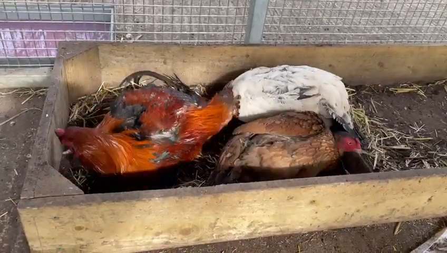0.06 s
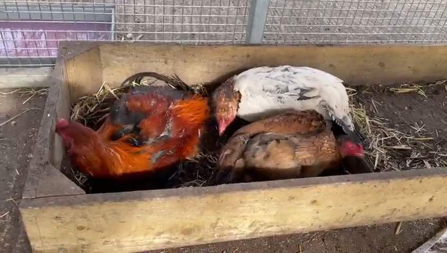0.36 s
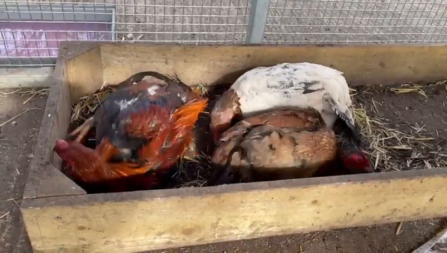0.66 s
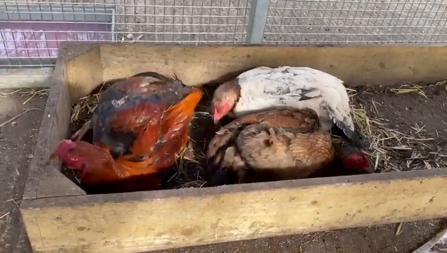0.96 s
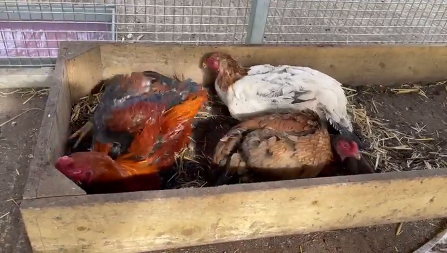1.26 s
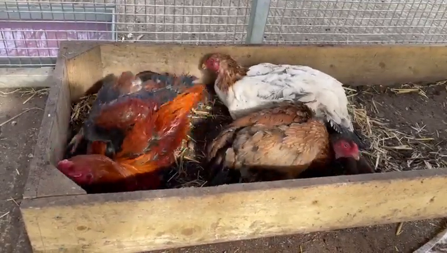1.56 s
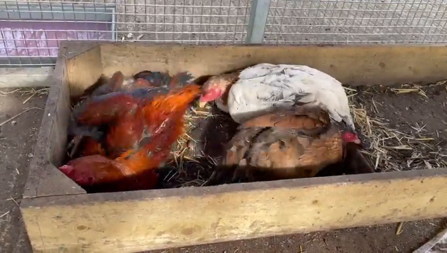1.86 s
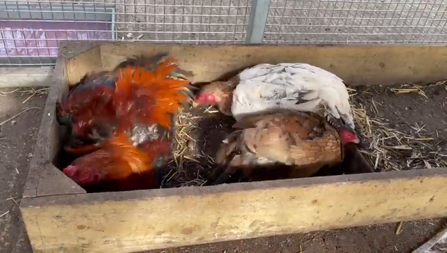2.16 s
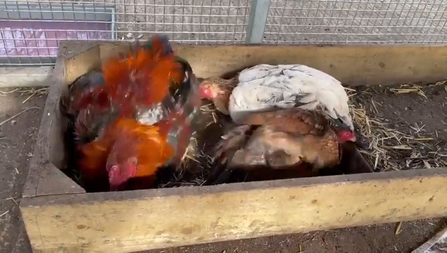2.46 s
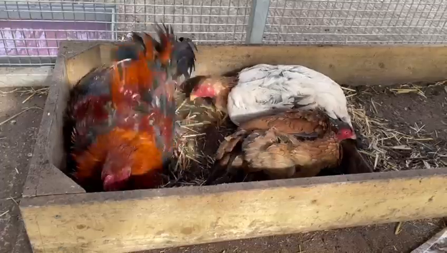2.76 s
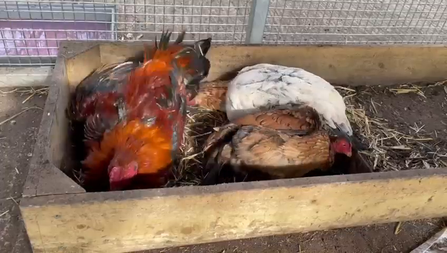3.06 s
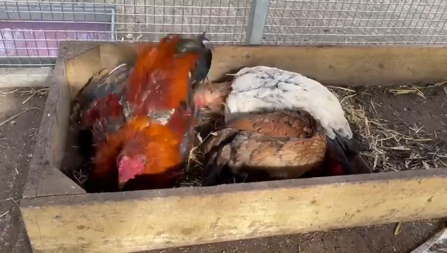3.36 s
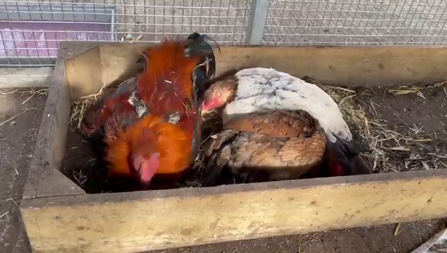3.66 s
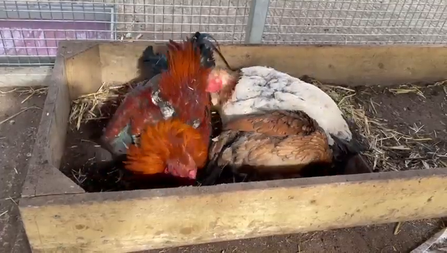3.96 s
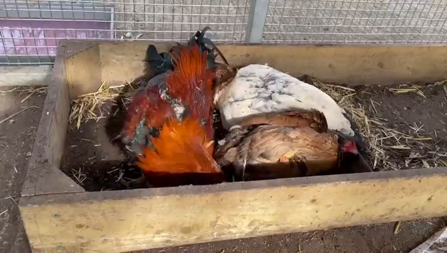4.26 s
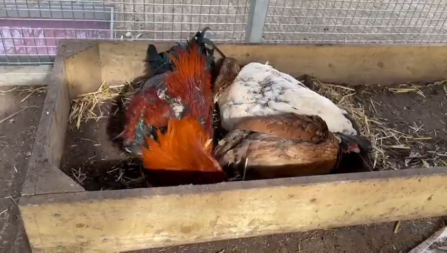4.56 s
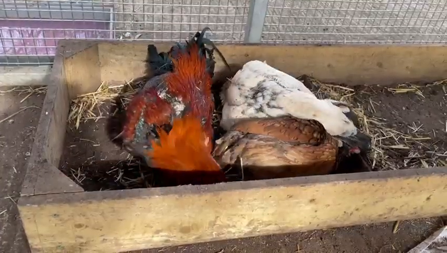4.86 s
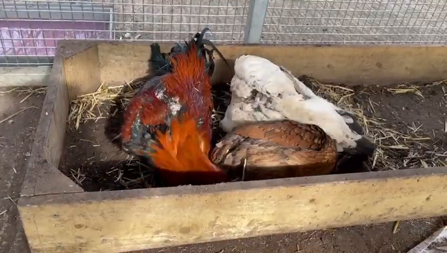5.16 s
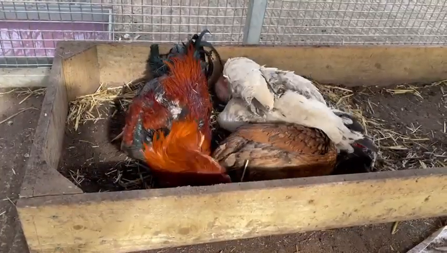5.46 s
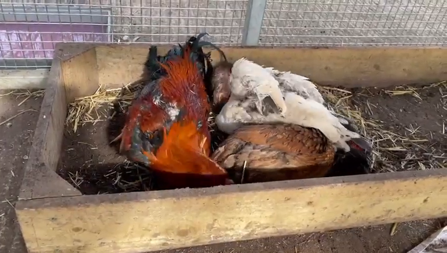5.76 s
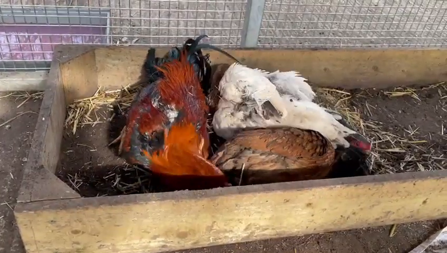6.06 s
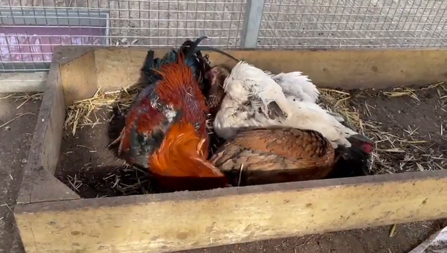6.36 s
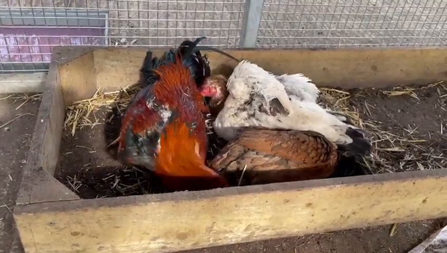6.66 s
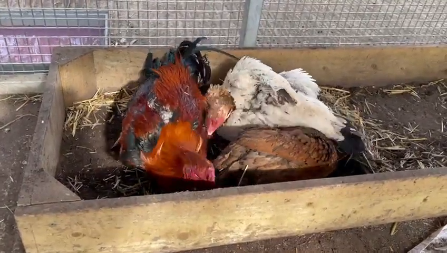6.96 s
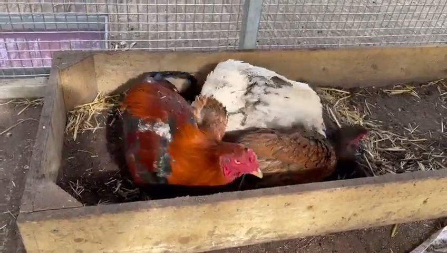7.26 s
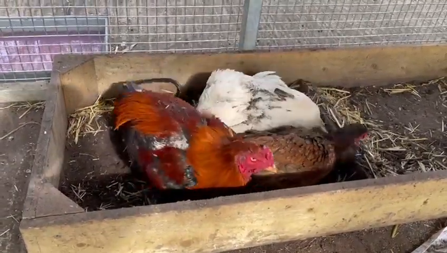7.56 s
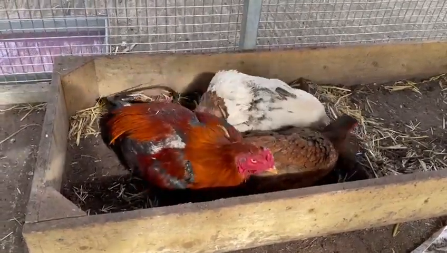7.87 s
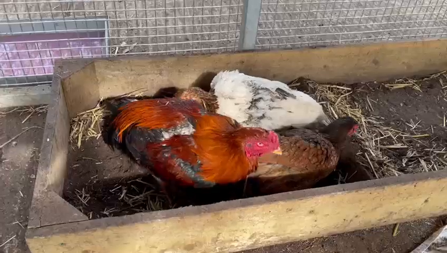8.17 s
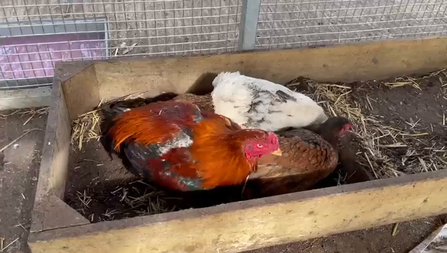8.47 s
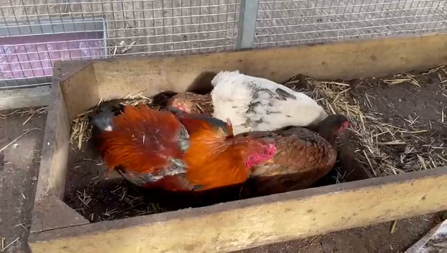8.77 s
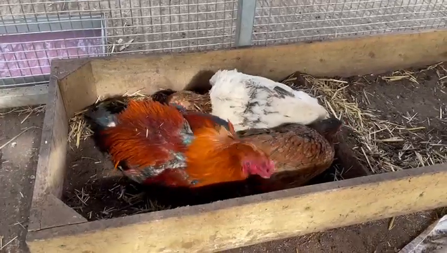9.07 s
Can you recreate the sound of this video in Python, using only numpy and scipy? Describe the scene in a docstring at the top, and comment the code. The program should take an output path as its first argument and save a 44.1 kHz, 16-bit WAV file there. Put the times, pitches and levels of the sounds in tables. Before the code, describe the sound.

Soft, close rustling and crackling of straw comes from chickens shuffling in a wooden box in an outdoor pen. A quick run of gritty scratches and knocks follows a single cluck. Two more short clucks come midway, then further wooden thumps and a couple of clucks near the end. Behind the nearby sounds, small birds chirp on and off and far traffic rumbles steadily.

```python
"""Distant traffic rumbles and hisses under a soft rustle of straw, and small birds chirrup and cheep.
Close to a phone, chickens dust-bathe in a wooden box: feathers sweep straw and soil into tiny contacts,
feet knock the boards into ringing and dry stalks snap. The rooster gives a few very short clucks,
each a brief buzz of the syrinx, and kicks through the grit."""
import sys
import numpy as np
from scipy import signal
from scipy.fft import rfft, irfft
from scipy.io import wavfile
from scipy.ndimage import uniform_filter1d

SR = 44100
rng = np.random.default_rng(int(sys.argv[2]) if len(sys.argv) > 2 else 0)


def inscribe(sig):
    """Save sig as 16-bit PCM at rate SR to the path in sys.argv[1].

    A 1-D sig is mono; a 2-D sig holds one channel per row.
    Samples are clipped to [-1, 1] before scaling.
    """
    pcm = np.round(np.clip(np.atleast_2d(sig).T, -1, 1) * 32767)
    wavfile.write(sys.argv[1], SR, pcm.astype(np.int16))


N = 410571
T = np.arange(N) / SR
FREQS = np.fft.rfftfreq(N, 1 / SR)


def undb(db):
    """Decibels to gain."""
    return 10 ** (np.asarray(db) / 20)


def unit(x):
    """Scale to rms 1."""
    return x / np.sqrt(np.mean(x ** 2))


def curves(table):
    """Every column of a timed table, sample by sample."""
    s, *columns = np.transpose(table)
    return [np.interp(T, s, c) for c in columns]


def across(points):
    """Join (Hz, value) points on a log-frequency axis."""
    hz, value = np.transpose(points)
    return np.interp(np.log(FREQS + 1), np.log(hz), value)


def colour(x, spectrum):
    """Minimum-phase filter; keeps the power of white input."""
    cepstrum = irfft(np.log(unit(undb(across(spectrum)))), N)
    cepstrum[1:N // 2] *= 2
    cepstrum[N // 2 + 1:] = 0
    return irfft(rfft(x) * np.exp(rfft(cepstrum)), N)


def band(x, lo_hz, hi_hz):
    """Band-pass."""
    sos = signal.butter(2, [lo_hz, min(hi_hz, SR / 2 - 1000)], "band", fs=SR, output="sos")
    return signal.sosfilt(sos, x)


def walk(rate_hz):
    """Slow random drift; rms 1."""
    hold = int(SR / rate_hz)
    steps = np.repeat(rng.standard_normal(N // hold + 1), hold)
    return unit(uniform_filter1d(steps, hold)[:N])


def add(out, start_s, x):
    """Mix x into out."""
    i = max(int(start_s * SR), 0)
    out[..., i:i + x.shape[-1]] += x[..., :max(N - i, 0)]


def reverb(x, t60_s):
    """Diffuse reflections, unrelated left and right."""
    t = T[:SR]
    tail = rng.standard_normal((2, SR)) * undb(-60 * t / t60_s) * (t > .006)
    return signal.fftconvolve(x[None], tail / np.sqrt(np.sum(tail ** 2) / 2))[:, :N]


def grains(rate_hz, spread_db):
    """Dense tiny contacts of unequal size; rms 1."""
    size = undb(spread_db * np.minimum(rng.exponential(size=N), 4))
    return unit((rng.random(N) < rate_hz / SR) * size * rng.choice([-1, 1], N))


# Traffic spectra. Each row: frequency in Hz, relative density in dB.
RUMBLE_SPECTRUM = [(15, -46.5), (25, -20), (38, -17), (52, -5.5), (72, -4.5), (100, -7), (125, -10.5),
                   (170, -14.5), (230, -15), (320, -24), (500, -26), (900, -32), (3000, -102.5)]
TYRE_SPECTRUM = [(150, -2.5), (350, 0.5), (600, 1.5), (950, 6), (1200, 4), (1600, -6), (2200, -13.5),
                 (3500, -26), (6000, -33), (8500, -80), (12000, -31.5)]
# Traffic draws nearer. Each row: time in seconds, relative tyre level in dB.
TYRE_LEVELS = [(0.0, -57.5), (2.87, -55), (3.76, -57), (6.2, -56), (7.21, -53), (8.45, -54), (9.31, -50)]
# One engine speeds up, then eases off. Each row: time in seconds, firing rate in Hz, relative level in dB.
ENGINE_RUN = [(0, 60, -49.5), (3.9, 63, -57), (4.75, 71, -47.5), (5.5, 75, -49.5), (6.6, 83, -43.5),
              (7.0, 82, -70), (8.1, 78, -49.5), (9.3, 62, -65)]


def traffic(hum_hz=205, hum_db=-61):
    """Rumble alike in both ears, diffuse tyre noise, one far engine and a faint steady hum."""
    tyre_db, = curves(TYRE_LEVELS)
    firing_hz, engine_db = curves(ENGINE_RUN)
    ears = np.array([[1], [-1]])
    mid, side, tyre_mid, tyre_side = rng.standard_normal((4, N))
    rumble = colour(mid + undb(-19) * ears * side, RUMBLE_SPECTRUM)
    rumble *= undb(-48.5 + 0.24 * T + 0.57 * walk(6))
    tyres = colour(tyre_mid + undb(1.5) * ears * band(tyre_side, 516, 9000), TYRE_SPECTRUM)
    tyres *= undb(tyre_db + 3 + .5 * walk(7.3) + ears * 1.2)
    engine = np.sqrt(2) * np.sin(2 * np.pi * np.cumsum(firing_hz) / SR)
    engine *= undb(engine_db - 3 + 2.7 * walk(4.6))
    hum = undb(hum_db + 2 * walk(2.95)) * np.sin(2 * np.pi * hum_hz * T)
    return rumble + tyres + engine + hum


def stalks(patchy_db=3):
    """Stalks of different lengths crackle, each in its own band, coming and going independently."""
    edges_hz = np.geomspace(1500, 13000, 12)
    return unit(sum(band(grains(rate_hz=550, spread_db=-0.5), lo, hi) * undb(patchy_db * walk(45))
                    for lo, hi in zip(edges_hz, edges_hz[1:])))


# How busily the chickens shuffle. Each row: time in seconds, relative level in dB.
SHUFFLE_LEVELS = [(0.0, -80.5), (0.47, -79.5), (0.65, -69.5), (1.04, -84.5), (1.89, -77), (2.41, -70),
                  (3.42, -70), (3.71, -77), (4.82, -84.5), (5.26, -72.5), (5.81, -83), (6.09, -78),
                  (6.58, -82.5), (7.18, -77), (8.68, -85), (9.31, -74.5)]
# Wing or foot sweeps. Each row: peak time in seconds, relative level in dB, length in seconds,
# soil weighting in dB.
SWEEPS = [(0.697, -56, 0.024, 11), (0.77, -58, 0.035, 12), (0.815, -63, 0.05, -10), (1.005, -59, 0.022, 7),
          (1.06, -57.5, 0.06, 9.5), (1.097, -54, 0.042, -7), (1.32, -62.5, 0.082, 10),
          (1.395, -54, 0.047, -13), (1.577, -69, 0.02, 23), (1.64, -62, 0.045, 12), (1.71, -48.5, 0.03, -3),
          (1.936, -62, 0.043, 15), (3.35, -58, 0.03, 5), (3.639, -60, 0.026, 11.5),
          (4.899, -63.5, 0.036, 7), (5.3, -64, 0.063, -2), (5.94, -57, 0.051, 7.5),
          (6.52, -60.5, 0.057, -12), (6.58, -67, 0.04, 9), (6.8, -51.5, 0.014, 6.5),
          (6.955, -67, 0.059, 13), (7.125, -66, 0.025, -4), (7.264, -55.5, 0.041, -8),
          (8.04, -64.5, 0.095, 13), (8.16, -71, 0.04, 18), (8.26, -76, 0.068, 22.5),
          (8.335, -66.5, 0.077, 14)]
# Litter spectra. Each row: frequency in Hz, relative density in dB.
STRAW_SPECTRUM = [(200, 1.5), (600, 1), (1200, 1), (1800, -6), (3500, 1), (5500, -5), (7000, -0.5),
                  (9000, -3.5), (11000, 2), (13000, -30)]
SOIL_SPECTRUM = [(150, -13), (400, 4), (1200, -4.5), (1900, -2), (3600, -10.5), (5500, -15), (9000, -41)]


def rustle(swell_share=0.47, restless_db=2.5):
    """Each sweep crackles the straw, rubs the feathers and shifts the duller soil below."""
    shuffle_db = curves(SHUFFLE_LEVELS)[0] + restless_db * walk(14)
    straw_power = undb(shuffle_db + 8) ** 2
    soil_power = undb(shuffle_db - 3) ** 2
    for peak_s, db, length_s, soil_db in list(SWEEPS) + kick_sweeps():
        slope_s = length_s * np.where(T < peak_s, swell_share, 1 - swell_share)
        power = undb(db) ** 2 * np.exp(-1.8 * np.abs(T - peak_s) / slope_s)
        straw_power += power
        soil_power += power * undb(soil_db) ** 2
    straw = undb(-5.5) * stalks()
    feathers = undb(-4) * grains(rate_hz=5000, spread_db=-2.5)
    crackle = colour((straw + feathers) * undb(2 * walk(60)), STRAW_SPECTRUM)
    crumble = colour(grains(rate_hz=3000, spread_db=3), SOIL_SPECTRUM)
    return undb(2.5) * np.sqrt(straw_power) * crackle + undb(-4) * np.sqrt(soil_power) * crumble


def whistle(length_s, start_hz, end_hz, shape=None, waver=.017, trill=0, trill_hz=171):
    """One note, gliding evenly or along a shape; waver and trill are shares of its pitch."""
    progress = np.linspace(0, 1, int(length_s * SR))
    share, height, db = np.transpose(shape or [(0, 1, 0), (1, 0, 0)])
    flutter = waver * unit(uniform_filter1d(rng.standard_normal(len(progress)), 96))
    flutter += trill * np.sin(2 * np.pi * trill_hz * progress * length_s)
    hz = (end_hz + (start_hz - end_hz) * np.interp(progress, share, height)) * (1 + flutter)
    envelope = undb(np.interp(progress, share, db)) * np.abs(np.sin(np.pi * progress)) ** 0.14
    return envelope * np.sin(2 * np.pi * np.cumsum(hz) / SR)


# Small birds' notes. Each row: start and length in seconds, start and end in Hz, relative level in dB.
BUZZY_NOTES = [(0.15, 0.07, 3030, 2700, -63), (3.78, 0.074, 2380, 2810, -60.5),
               (4.26, 0.045, 2300, 2600, -53), (4.725, 0.029, 2310, 2090, -55.5),
               (5.63, 0.05, 2400, 2030, -51.5), (8.21, 0.04, 4200, 4500, -60),
               (8.66, 0.06, 5160, 4260, -61), (8.7, 0.038, 6150, 5400, -61),
               (8.785, 0.032, 5000, 5880, -56.5)]
THIN_NOTES = [(0.288, 0.16, 8200, 7650, -70), (0.39, 0.19, 7480, 7000, -63), (0.85, 0.061, 3950, 3530, -64),
              (0.91, 0.1, 3570, 3540, -54), (0.975, 0.083, 3170, 3070, -63), (1.1, 0.084, 3820, 3900, -60),
              (1.23, 0.06, 2860, 2820, -63), (3.88, 0.04, 4100, 3900, -64), (5.12, 0.05, 4370, 4140, -53),
              (6.14, 0.045, 5250, 4470, -61), (6.215, 0.06, 3270, 2800, -63),
              (7.425, 0.04, 4220, 4650, -57), (7.49, 0.055, 4470, 4600, -65),
              (7.642, 0.03, 4720, 4530, -49), (7.657, 0.02, 4060, 4050, -47),
              (8.175, 0.03, 3300, 3510, -58), (8.51, 0.041, 3440, 3280, -58),
              (8.875, 0.05, 4130, 3800, -60), (8.915, 0.16, 3270, 3120, -61)]


def chirrups():
    """Thin whistles waver a little in pitch; buzzy notes waver enough to sound rough."""
    out = np.zeros(N)
    for notes, waver in (THIN_NOTES, .017), (BUZZY_NOTES, .09):
        for start_s, length_s, start_hz, end_hz, db in notes:
            add(out, start_s, undb(db - 4) * whistle(length_s, start_hz, end_hz, waver=waver))
    return out


# One bird's repeated cheep. Each row: start and length of the fall in seconds, relative level in dB,
# ledge pitch in Hz, closing note against the fall in dB.
CHEEP_CALLS = [(0.55, 0.071, -43, 3280, -13), (5.031, 0.091, -44.5, 3150, -17),
               (5.54, 0.115, -55.5, 3140, 0), (7.56, 0.088, -42.5, 3180, -14)]
# The pitch hooks up, falls to a ledge and drops off it. Each row: share of the length,
# height (ledge 0, top 1), relative level in dB.
CHEEP_CONTOUR = [(0, .6, -10), (.1, .97, 0), (.26, .92, 2.5), (.38, .45, 1), (.48, .06, -7), (.6, 0, -1),
                 (.82, 0, -1.5), (1, -.38, -6)]


def cheeps(top_hz=4176, lead_s=0.019, gap_s=0.02, close_s=0.095):
    """A short rising note leads into a trilled fall; a low held note closes it."""
    out = np.zeros(N)
    for start_s, fall_s, db, ledge_hz, close_db in CHEEP_CALLS:
        gain = undb(db - 2)
        lead = whistle(lead_s, start_hz=4520, end_hz=4950, waver=.045)
        fall = whistle(fall_s, top_hz, ledge_hz, CHEEP_CONTOUR, trill=.024)
        close = whistle(close_s, start_hz=2600, end_hz=2850, waver=.045)
        add(out, start_s - lead_s, gain * undb(-12) * lead)
        add(out, start_s, gain * fall)
        add(out, start_s + fall_s + gap_s, gain * undb(close_db) * close)
    return out


def small_birds():
    """Song from some way off: reflections off ground and pen roughen it, a diffuse tail blurs it."""
    song = cheeps() + chirrups()
    early = undb(-4.5) * reverb(song, t60_s=.08)
    late = undb(-3.5) * reverb(song, t60_s=.43)
    return undb(-5) * song + early + late


# Board modes. Each row: frequency in Hz, relative level in dB, T60 in seconds.
BOARD_MODES = [(167, -9, 0.12), (235, -0.5, 0.066), (272, -3.5, 0.061), (353, 1, 0.033),
               (446.5, -0.5, 0.071), (562, 1, 0.045), (681, -2.5, 0.043), (789, 1.5, 0.031),
               (970, -18, 0.045), (1140, -25, 0.082), (1394, 5.5, 0.045), (1403, 0.5, 0.072),
               (2550, -25, 0.034)]
# Feet and bodies hit the box. Each row: start in seconds, relative level in dB, main pitch in Hz,
# left minus right in dB, claw tick against the knock in dB, roll-off from the main pitch in dB/octave.
BOX_BUMPS = [(0.738, -38, 378, -3, -22, 9), (0.768, -42.5, 480, 1, -14, -4), (2.153, -37, 410, -3, -20, 8),
             (2.256, -31.5, 384, -3, -10, 3.5), (2.444, -36.5, 229, 0, -8, 8),
             (2.479, -29.5, 172, -3, -21, 14.5), (2.713, -36.5, 543, 0, -14, 4),
             (2.948, -30.5, 360, 0, -7, 6.5), (3.194, -32.5, 407, 1, -14, 12),
             (3.414, -27, 300, 0.5, -29, 6.5), (4.092, -35.5, 280, 1, -30, 8), (4.544, -50, 450, 3, -16, 5),
             (4.894, -39, 700, 1, -4, 1), (5.515, -41.5, 420, 0, -24, 7),
             (5.852, -34.5, 330, -1, -8.5, 4.5), (7.137, -32.5, 360, -1, -26, 6.5),
             (7.317, -35, 280, 1, -15, 1), (7.997, -27, 483, 1.5, -29, 7), (8.296, -23, 463, 1, -13, 11.5),
             (8.323, -39.5, 300, 1, -25, 8), (9.005, -39.5, 520, 1, -26, 7)]


def bumps(contact_s=.003, rattle_s=0.045, grit_s=0.014, tick_s=0.0058, lead_s=.002):
    """A claw ticks, the foot rings the boards and grinds soil; where it lands favours some modes."""
    out, t = np.zeros((2, N)), T[:8192]
    scuff = undb(-24) * t / contact_s * np.exp(-t / contact_s)
    rattle = undb(-37) * np.exp(-t / rattle_s)
    grit_envelope = undb(-10) * np.sqrt(2 * np.e * t / grit_s) * np.exp(-t / grit_s)
    for start_s, db, main_hz, pan_db, tick_db, rolloff_db in BOX_BUMPS:
        claws, soil = rng.standard_normal((2, len(t)))
        push = claws * (scuff + rattle)
        push[int(lead_s * SR)] += 1  # the impact
        ring = np.zeros(len(t))
        for k, (hz, mode_db, t60_s) in enumerate(BOARD_MODES):
            struck_db = mode_db - rolloff_db * abs(np.log2(hz / main_hz))
            ring += (-1) ** k * undb(struck_db - 60 * t / t60_s) * np.sin(2 * np.pi * hz * t)
        knock = signal.fftconvolve(push, ring)[:len(t)]
        knock /= np.sqrt(np.mean(knock[:700] ** 2))
        grit = unit(band(soil, 580, 1040)) * grit_envelope
        tick = undb(tick_db) * unit(band(rng.standard_normal(len(t)), 1100, 2700)) * np.exp(-t / tick_s)
        gain = undb(db - 7 + np.array([[pan_db], [-pan_db]]) / 2)
        add(out, start_s - lead_s, (knock + grit) * gain)
        add(out, start_s, tick * gain)
    return out


def thin_snaps(count=20, centre_hz=4370, width_octaves=0.53):
    """Rows like STRAW_SNAPS: thin straws break at random, louder when the shuffling is busy."""
    when, size, pitch = rng.uniform(-1, 1, (count, 3)).T
    start_s = (when + 1) / 2 * T[-1]
    peak_db = np.interp(start_s, *np.transpose(SHUFFLE_LEVELS)) + 20 + 5 * size
    return list(zip(start_s, peak_db, centre_hz * 2 ** (0.28 * pitch), [width_octaves] * count))


# The loudest straw breaks. Each row: start in seconds, peak in dB, band centre in Hz, width in octaves.
STRAW_SNAPS = [(0.812, -44.5, 5000, 2), (0.9894, -38.5, 3970, 1.2), (1.0952, -36, 3700, 1.8),
               (1.3867, -39.5, 4000, 1.3), (1.4082, -38, 4230, 1), (1.5718, -54, 3700, 1),
               (1.7205, -39, 4200, 1.3), (2.1999, -34.5, 4130, 0.4), (2.2214, -41, 4400, 0.41),
               (2.2945, -39, 7000, 1.3), (2.4187, -30, 4230, 1.1), (2.5132, -46, 4700, 0.61),
               (3.817, -51, 3500, 0.83), (3.862, -48, 8000, 1.3), (3.9629, -44, 10900, 1.4),
               (4.005, -49, 2900, 1), (4.777, -55, 3600, 1), (5.9304, -48, 4580, 1.1),
               (5.944, -44, 3600, 1.3), (5.953, -45, 3300, 1.4), (6.106, -35.5, 9800, 0.63),
               (6.7925, -54, 2600, 2.3), (7.254, -47, 6500, 0.81), (8.153, -50, 9000, 1.5)]


def snaps(tick_s=0.0017, splinter_s=.009, splinter_db=-18):
    """A dry stalk breaks: one sharp tick and a faint tail of splinters."""
    out, t = np.zeros(N), T[:2048]
    envelope = np.exp(-t / tick_s) + undb(splinter_db) * np.exp(-t / splinter_s)
    for start_s, peak_db, hz, octaves in list(STRAW_SNAPS) + thin_snaps():
        edge_ratio = 2 ** (octaves / 2)
        tick = band(rng.standard_normal(len(t)) * envelope, hz / edge_ratio, hz * edge_ratio)
        add(out, start_s, tick / np.abs(tick).max() * undb(peak_db))
    return out


# Open-beak resonances. Each row: centre in Hz, width in Hz, relative level in dB.
BEAK_BANDS = [(1340, 440, -2), (2270, 250, -4.5), (2860, 300, 1), (4010, 480, -4.5), (7330, 1600, -14.5)]
# The rooster's clucks. Each row: peak time in seconds, level in dB, pitch in Hz, glide in octaves/s,
# swell scale in seconds, then second harmonic, upper harmonics and rasp in relative dB.
ROOSTER_CLUCKS = [(2.052, -23, 356.8, 9.2, 0.0098, -0.5, -11, -27.5),
                  (4.2086, -22, 430.3, 6.4, 0.02, -9, -22, -23),
                  (4.358, -28, 285.4, 5.5, 0.0073, 1.5, -4.5, -46),
                  (7.942, -32, 401.5, 3.8, 0.0066, 8, -12, -30),
                  (9.156, -22.5, 335.5, 1.4, 0.0095, 2, -18, -28.5)]


def clucks(release_s=0.0065, jitter_octaves=0.069, throat_db=-12):
    """The syrinx buzzes for a few cycles, swelling and then shut off."""
    lead_s = T[1024]
    out, t = np.zeros(N), T[:3072] - lead_s
    for peak_s, db, hz, glide, swell_s, second_db, upper_db, rasp_db in ROOSTER_CLUCKS:
        swell = np.clip(1 + t / (swell_s * 1.44), 0, 1) ** 0.78
        envelope = np.where(t < 0, swell, np.exp(-(t / release_s) ** 2))
        wobble = jitter_octaves * unit(uniform_filter1d(rng.standard_normal(len(t)), 128))
        phase = 2 * np.pi * np.cumsum(hz * 2 ** (glide * t + wobble)) / SR
        upper = sum(undb(-4 * (k - 3) ** 3.5) * np.sin(k * phase) for k in range(3, 8))
        voice = np.sin(phase) + undb(second_db) * np.sin(2 * phase) + undb(upper_db) * upper
        # Turbulence puffs once a cycle: hollow in the throat, raspy at the beak.
        throat, air = rng.standard_normal((2, len(t)))
        hollow = unit(band(throat, 370, 750))
        rasp = unit(sum(undb(band_db) * band(air, centre_hz - width_hz / 2, centre_hz + width_hz / 2)
                        for centre_hz, width_hz, band_db in BEAK_BANDS))
        voice += (undb(throat_db) * hollow + undb(rasp_db) * rasp) * (1 + .5 * np.cos(phase))
        add(out, peak_s - lead_s, unit(voice) * envelope * undb(db))
    return out


# The rooster kicks about four times a second. Each row: peak time in seconds, relative straw level in dB,
# grit level in dB.
ROOSTER_KICKS = [(2.207, -49, -58), (2.46, -53.5, -43), (2.703, -54, -43.5), (2.943, -57.5, -44.5),
                 (3.188, -56, -43), (3.468, -57, -50)]
# Grit under a claw. Each row: frequency in Hz, relative density in dB.
GRIT_SPECTRUM = [(200, -2), (600, 4.5), (1100, 4), (1800, -7), (2400, -6.5), (3500, -10.5), (5000, -14),
                 (8000, -26)]


def scrapes(swell_s=0.03, release_s=0.016):
    """In each kick the claws bite ever harder into the grit, then lift."""
    force = sum(undb(grit_db) * np.exp(-np.abs(T - peak_s) / np.where(T < peak_s, swell_s, release_s))
                for peak_s, _, grit_db in ROOSTER_KICKS)
    return force * colour(grains(rate_hz=1500, spread_db=2.5), GRIT_SPECTRUM)


def kick_sweeps(kick_s=0.061, kick_soil_db=4.5, lag_s=0.079, flick_s=0.079, flick_soil_db=1):
    """Rows like SWEEPS: each kick sweeps the litter and a wing flick follows."""
    rows = []
    for peak_s, straw_db, _ in ROOSTER_KICKS:
        rows.append((peak_s, straw_db, kick_s, kick_soil_db))
        rows.append((peak_s + lag_s, -61.5, flick_s, flick_soil_db))
    return rows


# Lag between the microphone ports. Each row: frequency in Hz, phase difference in radians.
PORT_LAG = [(100, 0), (430, .25), (1100, 1.3), (1600, 1.1), (2400, .3), (3500, .9), (5300, .3), (6500, 1.3),
            (7700, 2.95), (9200, 3.14), (10300, 2.7), (11200, 1.5), (12000, .8)]


def ports(x, left_db, lag_share=1):
    """Near, off-axis sound reaches the two microphone ports out of step and louder on one side."""
    turn = np.exp(.5j * lag_share * across(PORT_LAG))
    return irfft(rfft(x) * np.array([turn * undb(left_db), turn.conj() * undb(-left_db)]), N)


def scene(wall_delay_s=0.0145):
    """Chickens in their box, a thin echo off the pen wall, a short dull tail, small birds and traffic."""
    voice, litter, knocks = clucks(), rustle() + scrapes(), bumps()
    echo = undb(-7) * band(np.interp(T - wall_delay_s, T, voice), 590, 1200)
    into_pen = undb(-11) * voice + undb(-8) * (knocks.mean(axis=0) + litter)
    pen = reverb(band(into_pen, 210, 2800), t60_s=0.19)
    near = ports(voice + echo, left_db=1.0) + ports(litter, left_db=-0.24)
    near += ports(snaps(), left_db=1.9, lag_share=0.82) + ports(knocks, left_db=0.2)
    return near + pen + small_birds() + traffic()


def record(dry, top_hz=11900):
    """The phone cuts the top treble."""
    return signal.sosfilt(signal.ellip(10, .2, 80, top_hz, fs=SR, output="sos"), dry)


dry = scene()
out = record(dry)
inscribe(out)
```